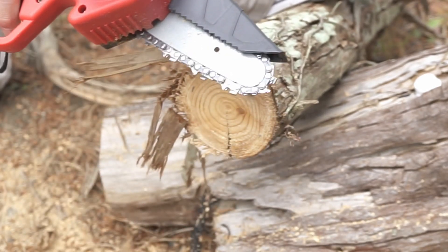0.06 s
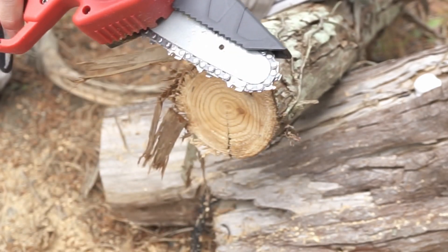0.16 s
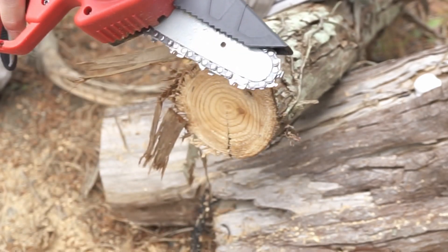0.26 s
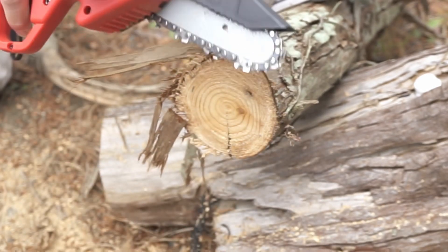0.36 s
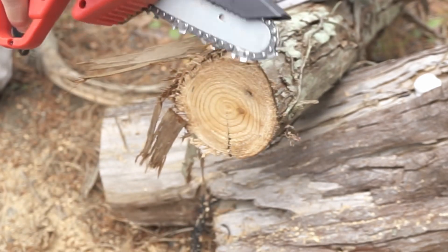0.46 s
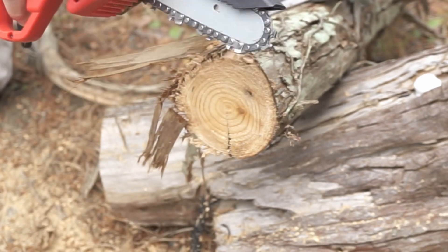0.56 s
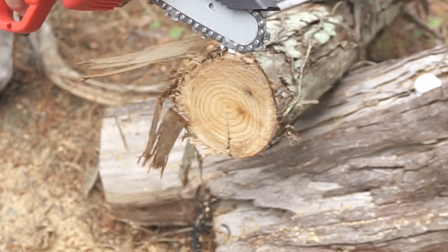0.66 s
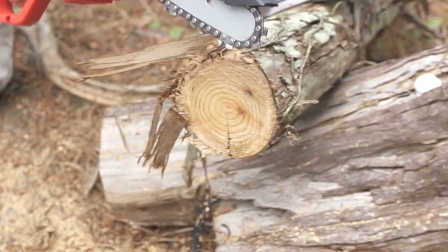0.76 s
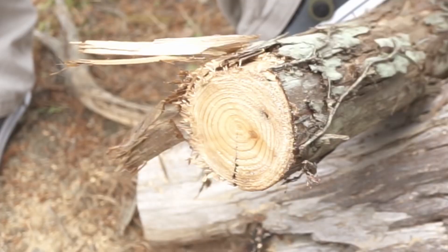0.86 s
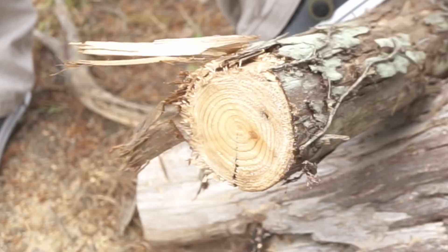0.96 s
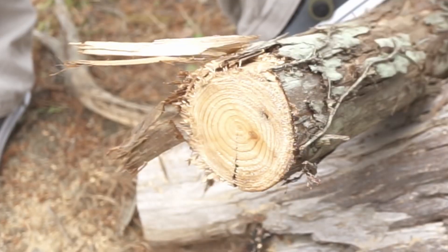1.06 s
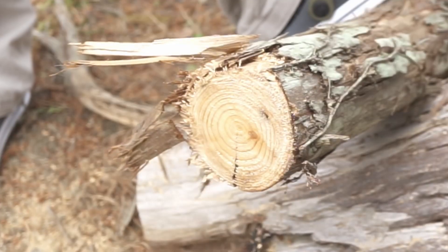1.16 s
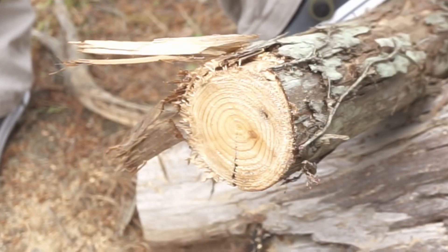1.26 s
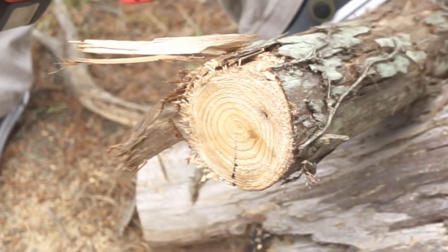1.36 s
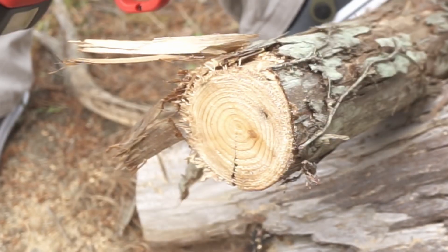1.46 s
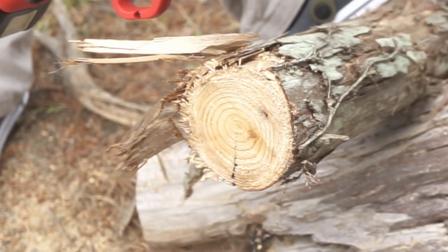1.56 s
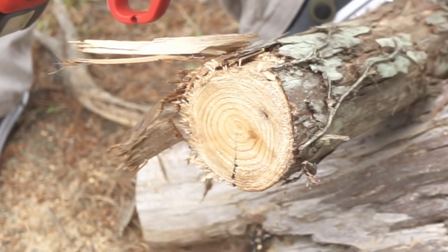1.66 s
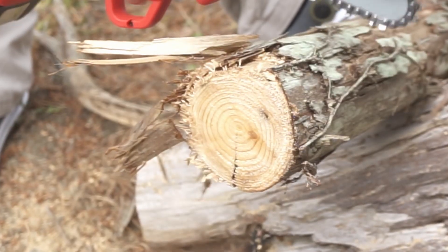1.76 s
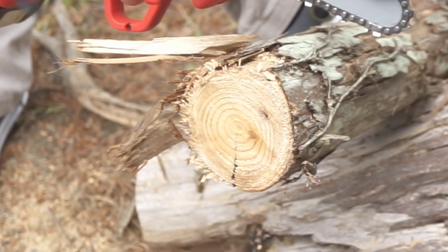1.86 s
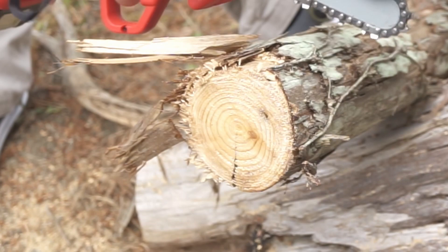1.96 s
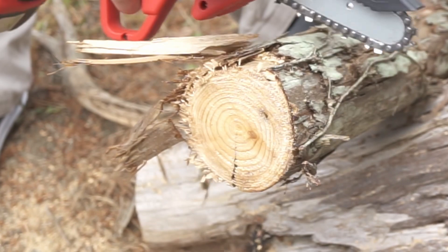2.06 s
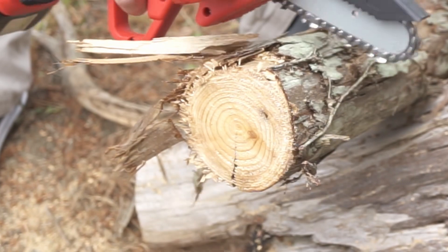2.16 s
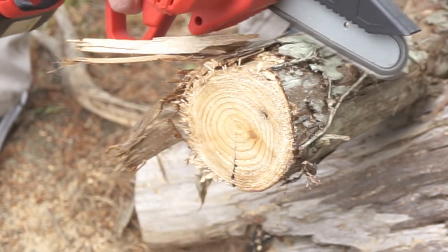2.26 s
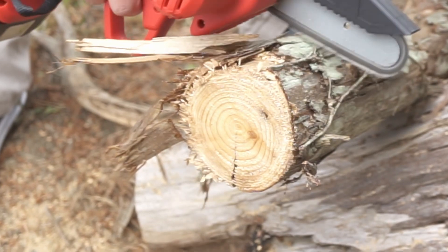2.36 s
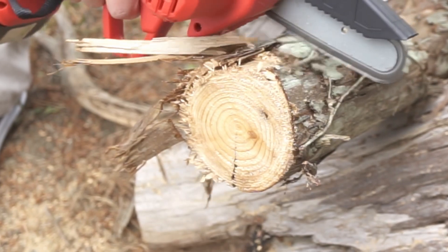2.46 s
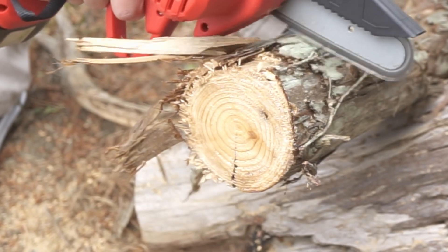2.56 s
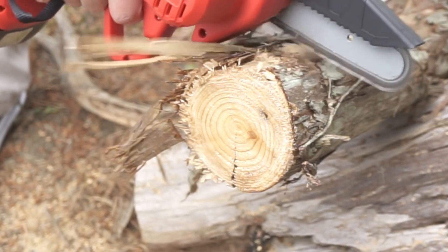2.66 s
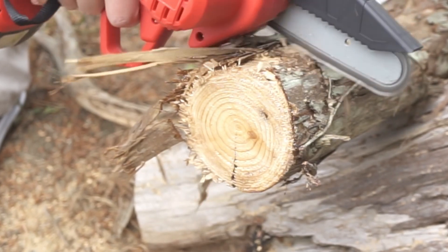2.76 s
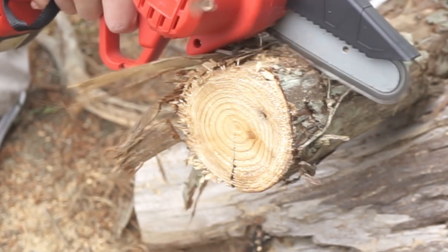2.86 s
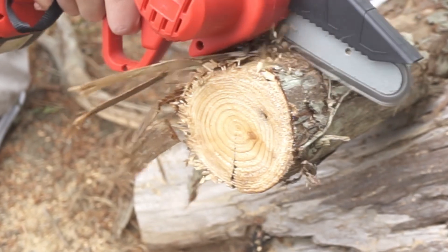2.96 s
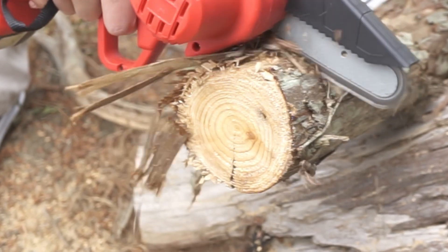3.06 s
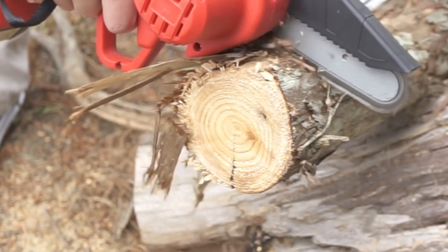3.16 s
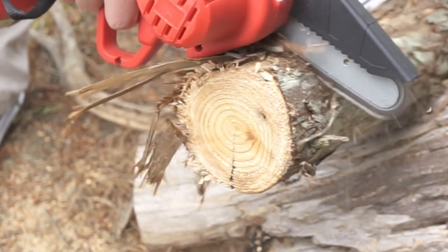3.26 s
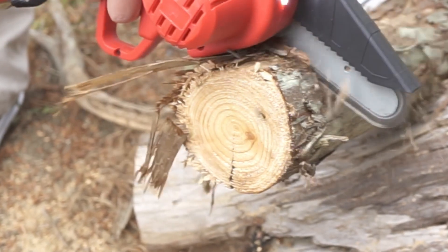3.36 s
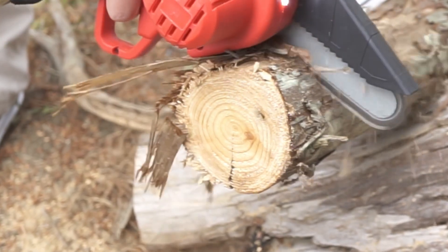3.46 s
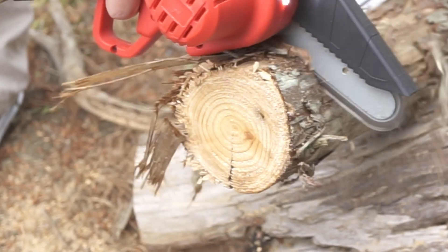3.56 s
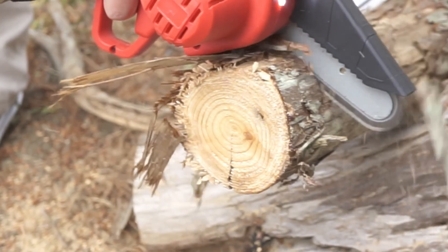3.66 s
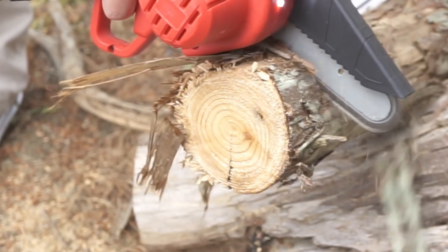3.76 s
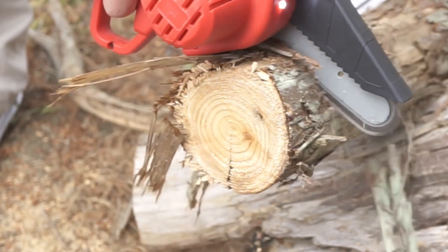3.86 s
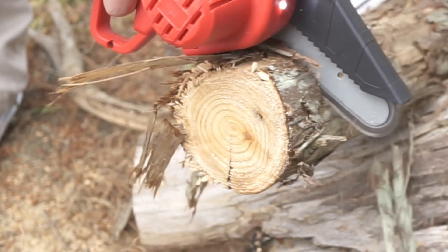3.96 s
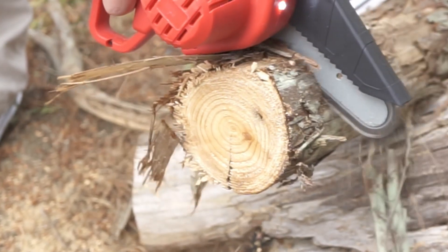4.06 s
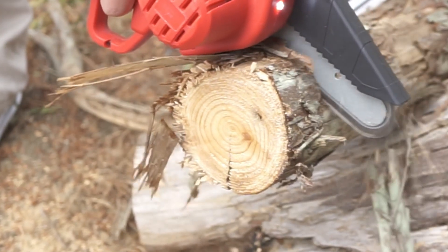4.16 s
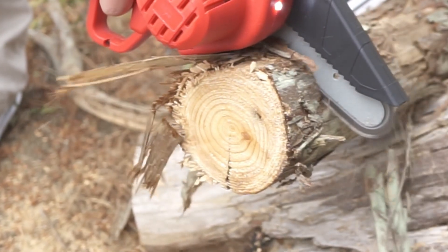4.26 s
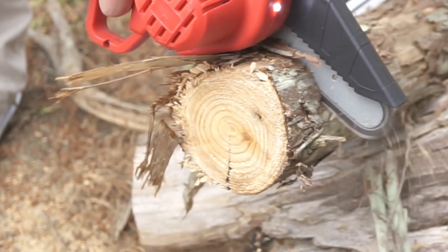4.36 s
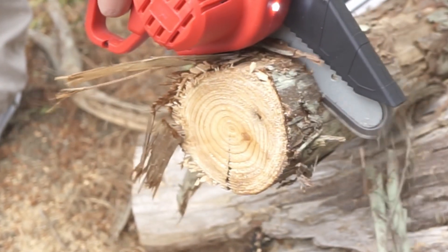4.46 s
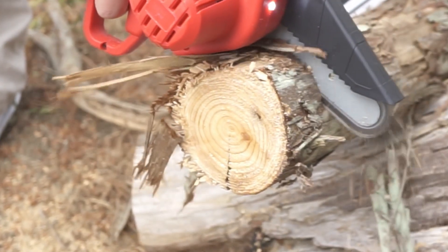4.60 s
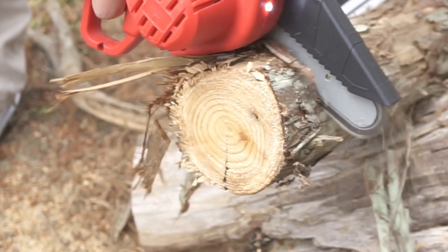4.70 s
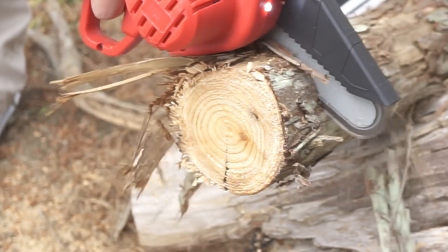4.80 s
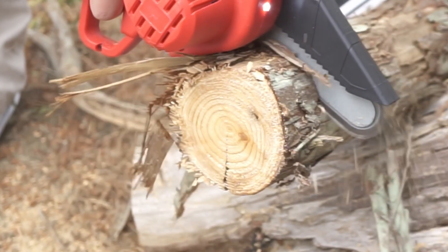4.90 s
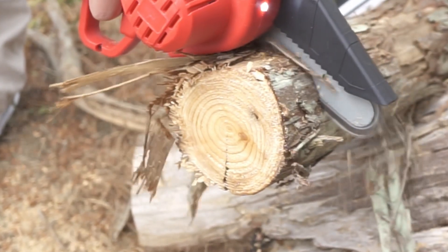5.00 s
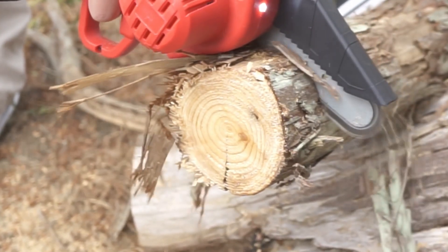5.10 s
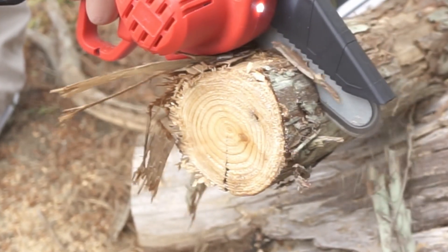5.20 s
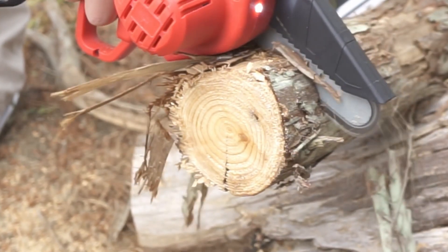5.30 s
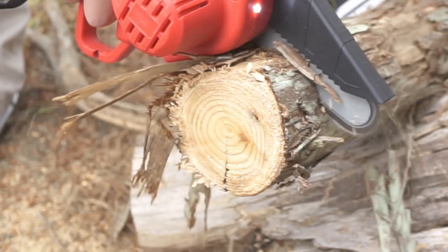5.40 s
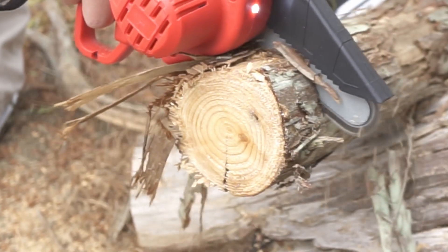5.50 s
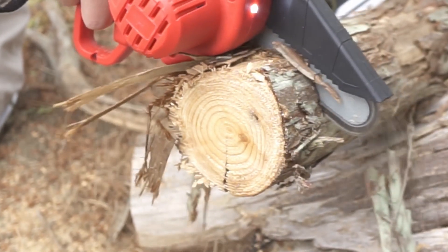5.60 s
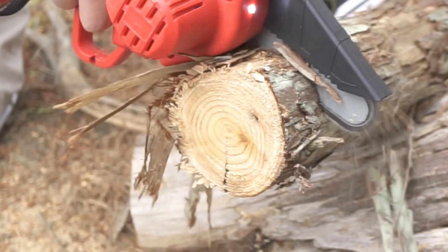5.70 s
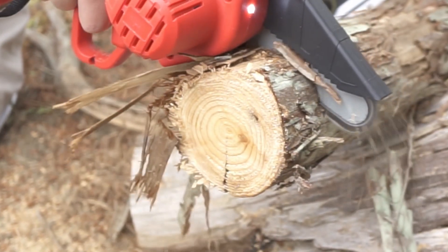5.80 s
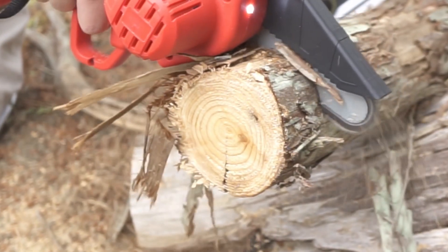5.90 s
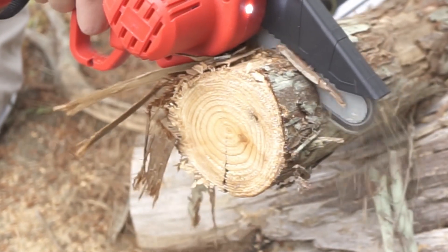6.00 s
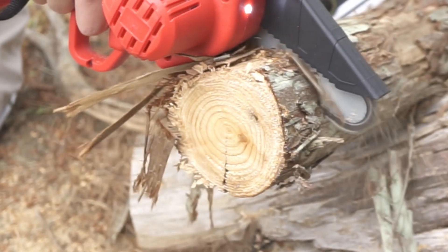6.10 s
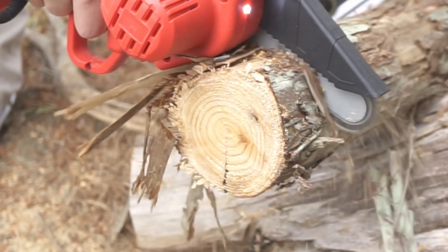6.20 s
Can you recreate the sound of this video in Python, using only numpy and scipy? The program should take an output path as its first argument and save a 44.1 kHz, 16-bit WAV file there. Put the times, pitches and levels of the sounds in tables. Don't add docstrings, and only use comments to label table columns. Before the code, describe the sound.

Low wind rumbles on a close microphone beside a log, with faint distant rumble and a thin insect tone. A battery saw blips for a fifth of a second, stops, and clothing rustles. Then a sharp click and a metallic whirr spin up; the chain meets bark with knocks and thuds, then grinds steadily through the wood with irregular cracks and a faint outdoor echo, without stopping.

```python
import sys
import numpy as np
from scipy import signal
from scipy.fft import rfft, irfft
from scipy.io import wavfile
from scipy.ndimage import uniform_filter1d

SR = 44100
rng = np.random.default_rng(int(sys.argv[2]) if len(sys.argv) > 2 else 0)


def boost(x):
    u = np.asarray(x, float) / 20
    return 10 ** u


def inscribe(sig):
    pcm = np.round(np.clip(np.atleast_2d(sig).T, -1, 1) * 32767)
    wavfile.write(sys.argv[1], SR, pcm.astype(np.int16))


N = 275184
TIME = np.arange(N) / SR


def unit(x):
    return x / np.sqrt(np.mean(x ** 2) + 1e-20)


def noise():
    return rng.standard_normal(N)


def curves(rows):
    s, *columns = np.transpose(rows)
    return [np.interp(TIME, s, column) for column in columns]


def bell(centre_s, length_s):
    return np.exp(-((TIME - centre_s) / length_s) ** 2)


def colour(x, spectrum, modes=(), lift_db=0., size=4096):
    hz = np.maximum(np.fft.rfftfreq(size, 1 / SR), 1)
    points = np.array(spectrum)
    gain = boost(np.interp(np.log(hz), np.log(points[:, 0]), points[:, 1]))
    for centre_hz, width_hz, db in modes:
        skirt = np.hypot(1, 2 * (hz - centre_hz) / width_hz) ** 2
        gain = np.hypot(gain, boost(db + lift_db) / skirt)
    cepstrum = irfft(np.log(gain + 1e-6))
    cepstrum[1:size // 2] *= 2
    cepstrum[size // 2 + 1:] = 0
    taps = irfft(np.exp(rfft(cepstrum)))
    return signal.oaconvolve(x, taps / np.linalg.norm(taps))[:N]


def drift(rate_hz):
    r = np.exp(-2 * np.pi * rate_hz / SR)
    slow = signal.lfilter([1], [1, -2 * r, r * r], rng.standard_normal(N + SR))[SR:]
    return unit(slow - slow.mean())


# (time [s], level [dB])
BREEZE = [(0, -34.5), (.8, -29), (1.2, -22.5), (2.2, -23), (3.3, -25.5), (4.1, -38), (4.6, -31.5),
          (4.9, -39), (6.24, -40)]
# (time [s], peak [dB], length [s])
GUSTS = [(.19, -29, 0.019), (0.602, -26, 0.021), (0.934, -13, 0.054), (1.112, -11, 0.053),
         (1.275, -16.5, 0.057), (1.503, -22, 0.048), (1.564, -17, 0.021), (1.637, -16, 0.019),
         (1.784, -18.5, 0.13), (2.082, -19, 0.052), (2.266, -18.5, 0.014), (2.477, -15.5, 0.031),
         (2.67, -18, 0.046), (2.807, -20, 0.015), (2.88, -25, 0.013), (3.08, -20, .05), (3.247, -25, 0.051),
         (3.517, -26.5, .06), (3.7, -25.5, .08), (3.973, -30, .03), (4.067, -28, 0.026),
         (4.214, -31, 0.051), (5.245, -35, 0.044), (6.07, -34, 0.024)]


def wind_db():
    power = boost(curves(BREEZE)[0]) ** 2
    for s, db, length_s in GUSTS:
        power += boost(db) ** 2 * bell(s, length_s)
    return 10 * np.log10(power)


# (frequency [Hz], density [dB per Hz])
GUST_SPECTRUM = [(7.1, -24), (12, 2.5), (27, -5), (44, -5.5), (106, -24), (150, -34), (200, -45.5),
                 (330, -120)]


def wind(gust_db, duck_db):
    lumps = boost(0.53 * drift(6.4)) * noise()
    pressure = unit(colour(lumps, GUST_SPECTRUM, size=16384))
    edge_spectrum = [(100, -41), (150, 3.5), (200, -6), (300, -24.0), (500, -57.0)]
    edge = colour(noise(), edge_spectrum, size=16384)
    flutter_db = -57.5 + 2.3 * (gust_db + 18) + duck_db
    return boost(gust_db) * pressure + boost(flutter_db) * edge


# (frequency [Hz], density [dB per Hz])
FAR_SPECTRUM = [(150, -21), (250, 0), (493, -9.5), (802, -7), (1350, -10), (2360, -23), (3170, -24),
                (3580, -18.5), (4990, -31), (13900, -36), (16000, -46.5)]


def far_rumble(gust_db, duck_db):
    lag_s = 0.18
    stir_db = 0.42 * (uniform_filter1d(gust_db, int(lag_s * SR)) + 17.5)
    level_db = -59.5 + stir_db + duck_db + 1.0 * drift(5.7)
    return boost(level_db) * colour(noise(), FAR_SPECTRUM)


def insect():
    tone_hz, pulse_hz, level_db = 3600, 60, -94
    chirp = np.maximum(np.cos(2 * np.pi * pulse_hz * TIME), 0) ** 3
    return boost(level_db) * chirp * np.sin(2 * np.pi * tone_hz * TIME)


# (time [s], hold [s], level [dB], fade [dB per s])
RUSTLE = [
    (0, .02, -65.5, 220),
    (0.873, 0.35, -64, 60),
    (1.197, .07, -60.5, 291),
    (1.54, 0.026, -55.5, 70),
    (1.868, 0.039, -56.5, 300),
    (1.968, .02, -56, 100),
    (1.988, 0.021, -53, 172),
    (2.09, .08, -62, 300),
]
# (frequency [Hz], density [dB per Hz])
CLOTH_SPECTRUM = [(880, -39), (1500, -7.5), (2360, -8.5), (4130, -5), (5100, -14.5), (6110, -13.5),
                  (14600, -24), (16000, -34), (16500, -46)]


def rustle():
    rise_db_per_s = 1200
    moves_db = []
    for s, hold_s, db, fade in RUSTLE:
        rising = rise_db_per_s * np.maximum(s - TIME, 0)
        fading = fade * (TIME - s - hold_s)
        moves_db.append(db - np.maximum(rising, fading))
    level_db = np.max(moves_db, axis=0) + 2.0 * drift(80)
    return boost(level_db) * colour(noise(), CLOTH_SPECTRUM)


# (time [s], peak [dB])
TRIGGER = [
    (1.2241, -37),
    (1.2695, -33),
    (1.282, -30.5),
    (2.1524, -39),
    (2.163, -14.5),
    (2.195, -12),
]


def trigger_clicks():
    decay_s = 0.0054
    events = np.array(TRIGGER)
    marks = np.zeros(N)
    marks[(events[:, 0] * SR).astype(int)] = boost(events[:, 1])
    puff = signal.lfilter([1], [1, -np.exp(-1 / (decay_s * SR))], marks + 1e-18)
    grit = rng.choice([-1, 1], N) * rng.uniform(0.93, 1, N)
    shell_spectrum = [(800, -12.5), (3500, -3), (11000, -13), (16000, -16.5)]
    return boost(-15.5) * colour(puff * grit, shell_spectrum)


# (level [dB], t60 [s], dull above [Hz])
ECHOES = [
    (-23, 0.58, 3000),
    (-44, 1.5, 3800),
]


def surroundings(x):
    t, out = TIME[:SR], 0
    for db, t60_s, dull_hz in ECHOES:
        tail = rng.standard_normal(SR) * boost(-60 * t / t60_s) * (t > .015)
        lowpass = signal.butter(2, dull_hz, fs=SR, output="sos")
        tail = signal.sosfilt(lowpass, tail / np.linalg.norm(tail))
        out = out + boost(db) * signal.oaconvolve(x, tail)[:N]
    return out


# (on [s], off [s], rise time constant [s])
RUNS = [
    (1.269, 1.478, 0.017),
    (2.167, 6.3, 0.025),
]
# (time [s], share of free speed [0-1], load in the wood [0-1])
FEED = [(2.5, 1, 0), (2.78, .995, 0), (2.83, .988, .3), (2.9, .97, .8), (2.96, .955, .1), (3.03, .94, .9),
        (3.1, .92, .5), (3.3, .866, 1), (4.1, .825, 1), (4.6, .85, 1), (5.2, .872, 1), (5.8, .865, 1),
        (6.24, .84, 1)]
# (time [s], level over free running [dB])
LEAN = [(2.5, -0.5), (2.83, -1), (2.9, 1.5), (2.96, -1), (3.03, 1), (3.1, -0.4), (3.3, 2), (3.6, 1.76),
        (4.1, 0.5), (4.6, -0.16), (4.9, -2), (5.3, -1.5), (5.7, -2.5), (5.95, -2), (6.24, -2.5)]


def motor():
    free_links_per_s, spin_up_s, brake_s = 204.5, .058, .045
    saw_db, start_below_db = -23, 37
    brake_db_per_s, stall_db_per_s2 = 247.5, 2498
    share, load = curves(FEED)
    lean_db = curves(LEAN)[0]
    speed, db = np.zeros(N), np.full(N, -200.)
    for on, off, rise_s in RUNS:
        since, after = np.maximum(TIME - on, 0), np.maximum(TIME - off, 0)
        speed += (1 - np.exp(-since / spin_up_s)) * np.exp(-after / brake_s)
        run_db = -start_below_db * np.exp(-since / rise_s)
        run_db = run_db - brake_db_per_s * after - stall_db_per_s2 * after ** 2
        db = np.maximum(db, np.where(TIME < on, -200, np.maximum(run_db, -200)))
    rate = np.maximum(free_links_per_s * speed * share, 20)
    return rate, np.clip(load, 0, 1), saw_db + db + lean_db, np.clip(speed, 0, 1)


def clatter(links, rate, uneven_db, cutter_db, link_db, sprocket_db, flicker_db):
    force = rng.standard_normal(3000)[links.astype(int)]
    since = links % 1
    gap_db = np.minimum(link_db * (200 / rate) ** 3, 12) * (since - .4)
    knock_db = uneven_db * force + cutter_db * (links % 4 < 1)
    db = knock_db * np.exp(-((since - .3) / .45) ** 2) - gap_db
    db = db + sprocket_db * np.cos(2 * np.pi * links) + flicker_db * drift(40)
    ticks = boost(2.0 * np.minimum(rng.exponential(1, N), 6))
    return unit(boost(db) * ticks * noise())


SPLIT_HZ = [900, 2700, 4300]


def parts(x):
    low, mid, high = SPLIT_HZ
    shapes = [([low, mid], "band"), (low, "low"), ([mid, high], "band"), (high, "high")]
    filters = [signal.butter(3, hz, kind, fs=SR, output="sos") for hz, kind in shapes]
    return np.array([unit(signal.sosfilt(sos, x)) for sos in filters])


# (frequency [Hz], density [dB per Hz])
FREE_SPECTRUM = [(150, -77), (260, -32), (350, -26.5), (480, -16.5), (960, -9.5), (1550, -3), (3000, -7),
                 (6000, 1.5), (10000, 4), (13000, 1), (16000, -4)]
# (frequency [Hz], width [Hz], level [dB])
FREE_MODES = [(1520, 170, -2.5), (3495, 620, 0), (3700, 410, 1), (5310, 730, -1.5), (6840, 200, -10.5),
              (6660, 200, -8), (7370, 1100, 3.5), (8900, 200, -15), (10060, 280, -9), (12800, 350, -10.5)]
# (frequency [Hz], density [dB per Hz])
CUT_SPECTRUM = [(76, -35), (130, -24.5), (176, -17.5), (505, -11.5), (774, -7), (950, -4.5), (1540, 10),
                (2000, 2.5), (2900, -1), (4250, -13.5), (6000, 5), (12200, 6), (16000, -2)]
# (frequency [Hz], width [Hz], level [dB])
CUT_MODES = [(759, 17, -7.5), (1515, 130, 1), (3426, 540, 8.5), (3828, 410, 5.5), (5044, 1100, 1.5),
             (6560, 77, 3), (10060, 110, 3), (12000, 510, -3.5)]
# (time [s], level [dB])
TAUT = [
    (1.322, 5.5),
    (2.248, 4.5),
]


def chain(rate, load, level_db, speed):
    links = np.cumsum(rate * (1 + (.02 + .04 * load) * drift(30))) / SR
    loose = clatter(links, rate, 2.2, cutter_db=1.8, link_db=1.2, sprocket_db=.4, flicker_db=.5)
    loaded = clatter(links, rate, 1.6, cutter_db=1.4, link_db=.6, sprocket_db=1.4, flicker_db=.6)
    free = colour(loose, FREE_SPECTRUM, FREE_MODES, lift_db=3)
    cut = colour(loaded, CUT_SPECTRUM, CUT_MODES, lift_db=6.5)
    housing, log, bar, hiss = np.sqrt(1 - load) * parts(free) + np.sqrt(load) * parts(cut)
    slow = 1 - speed
    buried_s = 0.43
    sunk = 1 - np.exp(-np.cumsum(load) / SR / buried_s)
    log_db = -12 + 5 * load + 6.5 * slow
    bar_db = 4.5 - 1.28 * load - 1 * slow
    bar_db += 3 * bell(5.11, 0.51)
    bar_db += sum(db * bell(s, .012) for s, db in TAUT)
    hiss_db = 4.5 - 6 * slow - 3 * sunk
    mix = housing + boost(log_db) * log + boost(bar_db) * bar + boost(hiss_db) * hiss
    return boost(level_db + 2.45) * mix


# (multiple of link rate, in air [dB], in wood [dB], wobble [Hz])
HUM = [
    (1, -82, -42.5, 6),
    (2, -46.5, -42, 6),
    (1.178, -82, -49, 2),
    (2.365, -42, -47, 4),
    (4.7, -60, -46, 4),
]


def hum(rate, load):
    out = 0
    for multiple, air_db, wood_db, wobble_hz in HUM:
        hz = multiple * rate + wobble_hz * (.1 + load) * drift(8)
        level_db = air_db + load * (wood_db - air_db) + 2.5 * load * drift(9)
        out = out + boost(level_db) * np.sqrt(2) * np.sin(2 * np.pi * np.cumsum(hz) / SR)
    return out * np.clip(rate / 200, 0, 1) ** 4 * np.clip(rate / 165, 0, 1) ** 12


def whine():
    start_s, length_s, tone_hz, level_db = 2.1535, .009, 8500, -58
    gate = np.abs(TIME - start_s - length_s / 2) < length_s / 2
    return boost(level_db) * gate * np.sin(2 * np.pi * tone_hz * TIME)


# (time [s], peak [dB], ring [Hz])
SNAGS = [(2.7729, -4, 3600), (2.8088, 0.5, 3820), (2.936, -2.5, 3660), (3.0213, -3.5, 3470),
         (3.5112, -9, 3750), (3.7876, -5, 3520), (4.1358, -19, 3530), (4.1537, -1.5, 3560),
         (4.2645, -2.5, 3250), (4.3413, -2, 3380), (4.3937, -2, 3910), (4.471, -2, 4960),
         (4.5289, -5, 3610), (4.5483, -5.5, 3690), (4.5728, -3, 3460), (4.6356, 2.5, 3270),
         (4.8317, -6, 3830), (4.8841, -3, 3130), (4.9449, -1.5, 3310), (4.9739, 0.5, 3180),
         (5.0083, -10, 3180), (5.0307, -1.5, 3220), (5.0617, 2.5, 3420), (5.2413, -2, 3180),
         (5.2662, -2.5, 3180), (5.4019, -3, 3270), (5.4757, -3.5, 3100), (5.5775, -1.5, 3200),
         (5.6354, -4, 3120), (6.023, -1, 3860)]
# (time [s], peak [dB], ring [Hz])
KNOCKS = [(2.895, -15, 1540), (3.149, -9.5, 1530), (3.213, -10.5, 1480), (3.262, -7.5, 1450),
          (3.311, -7.5, 1220), (3.409, -11, 1520), (3.469, -12, 1400), (3.51, -11.5, 1444),
          (3.623, -12.5, 1570), (3.789, -10.5, 1490), (3.933, -11, 1460), (3.966, -10.5, 1540),
          (3.995, -9, 1430), (4.092, -11, 1510), (4.19, -10, 1640), (4.265, -10.5, 1710)]
# (frequency [Hz], density [dB per Hz])
SNAG_SPECTRUM = [(150, -40), (500, -26), (1500, -12), (3300, -8), (5000, -14), (9000, -17), (16000, -24)]
# (frequency [Hz], density [dB per Hz])
LOG_SPECTRUM = [(120, -50), (250, -6), (450, 3), (800, 2), (1500, -22), (16000, -40)]


def snags():
    out, t = np.zeros(N + 2048), TIME[:2048]
    start_s = FEED[2][0]
    nicks_per_s, nick_db, nick_spread_db, nick_hz, nick_spread_hz = 16, -6, 1.2, 3450, 250
    crack_db, thud_db, thud_spread_db, knock_db = -0.5, -26.5, 1.2, 6.5
    luck = rng.standard_normal((int(nicks_per_s * (TIME[-1] - start_s)), 2))
    nick_times = rng.uniform(start_s, TIME[-1], len(luck))
    nicks = np.c_[nick_times, [nick_db, nick_hz] + luck * [nick_spread_db, nick_spread_hz]]
    events = np.r_[SNAGS, np.add(KNOCKS, [0, knock_db, 0]), nicks]
    grit = rng.standard_normal((len(events), 2, 2048))
    for (s, db, hz), (tear, push) in zip(events, grit):
        crack = colour(tear * t * np.exp(-t / .0012), SNAG_SPECTRUM, [(hz, 900, 0.)])[:2048]
        thud = colour(push * t * np.exp(-t / .004), LOG_SPECTRUM)[:2048]
        hit = boost(.5 * db + crack_db) * crack / np.abs(crack).max()
        hit += boost(thud_db + thud_spread_db * push[0]) * thud / np.abs(thud).max()
        at = int((s - .001) * SR)
        out[at:at + 2048] += boost(db) * hit
    return out[:N]


# (time [s], peak [dB])
BITES = [(2.893, -22), (2.915, -25), (2.987, -23), (3.02, -23), (3.059, -21), (3.135, -24), (3.271, -22),
         (3.31, -24), (3.372, -25), (3.424, -25), (3.509, -24), (3.577, -26), (3.626, -27)]
# (frequency [Hz], width [Hz], level [dB])
LOG_MODES = [(300, 84, 6), (358, 36, 7), (447, 22, 14.5), (736, 140, 8)]


def bites():
    out, t = np.zeros(N), TIME[:4096]
    for (s, db), push in zip(BITES, rng.standard_normal((len(BITES), 4096))):
        shake = colour(push * t * np.exp(-t / .012), LOG_SPECTRUM, LOG_MODES)[:4096]
        at = int(s * SR) - 300
        out[at:at + 4096] += boost(db + 2) * shake / np.abs(shake).max()
    return out


def scene():
    rate, load, level_db, speed = motor()
    saw = trigger_clicks() + chain(rate, load, level_db, speed) + hum(rate, load)
    saw = saw + whine() + snags() + bites()
    gust_db = wind_db()
    duck_db, far_duck_db = -4.5 * speed, -13.5 * speed
    air = wind(gust_db, duck_db) + far_rumble(gust_db, duck_db + far_duck_db)
    return (saw + surroundings(saw) + air + insect() + rustle())[None]


def roll_off(x):
    return signal.sosfilt(signal.butter(12, 17050, fs=SR, output="sos"), x)


def record(dry):
    soft = dry / (1 + (dry / .84) ** 6) ** (1 / 6)
    lowpass = signal.ellip(12, .3, 90, 15720, fs=SR, output="sos")
    return roll_off(signal.sosfilt(lowpass, soft))


dry = scene()
out = record(dry)
inscribe(out)
```